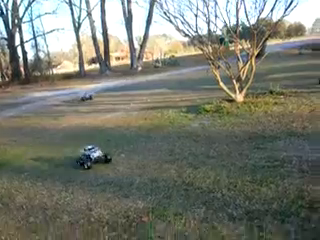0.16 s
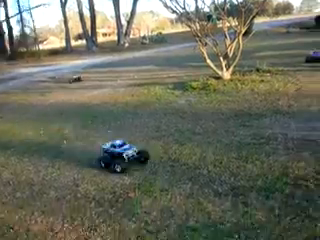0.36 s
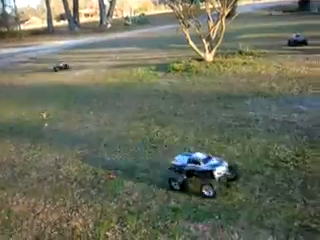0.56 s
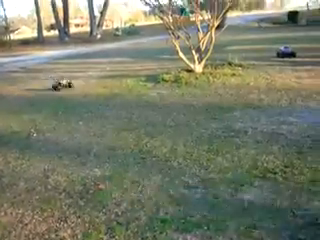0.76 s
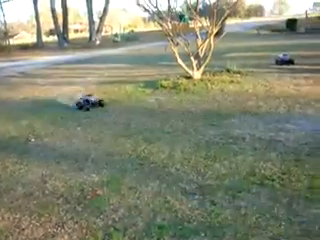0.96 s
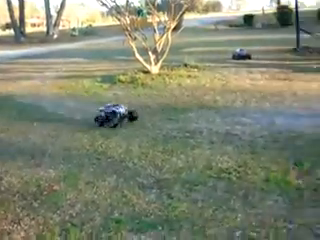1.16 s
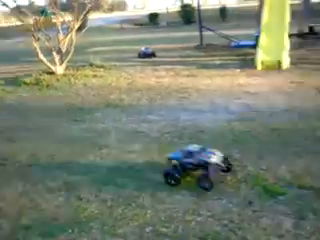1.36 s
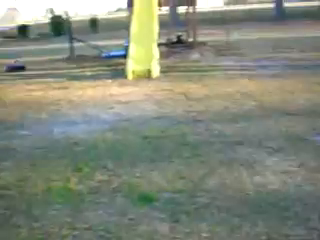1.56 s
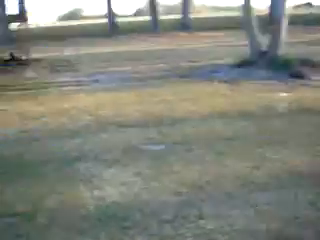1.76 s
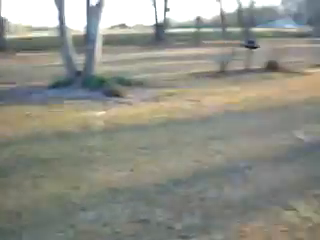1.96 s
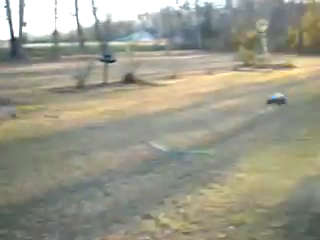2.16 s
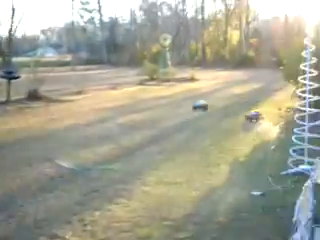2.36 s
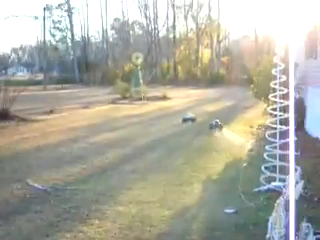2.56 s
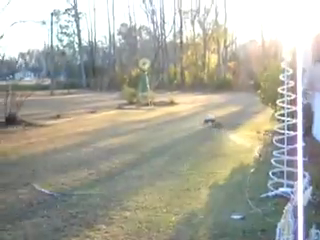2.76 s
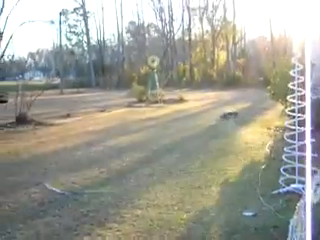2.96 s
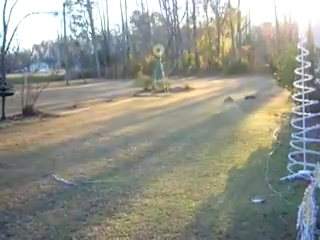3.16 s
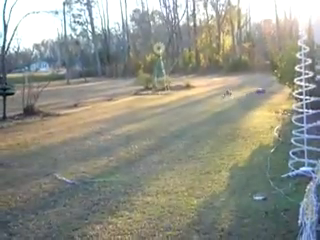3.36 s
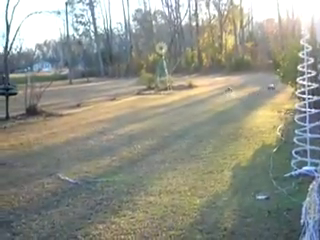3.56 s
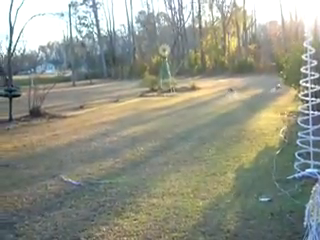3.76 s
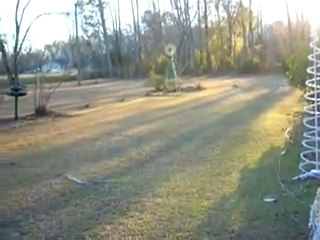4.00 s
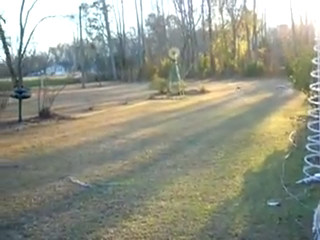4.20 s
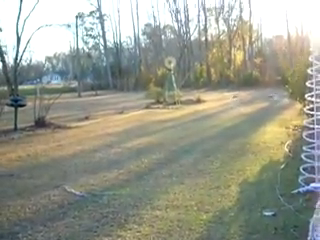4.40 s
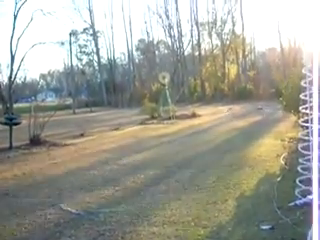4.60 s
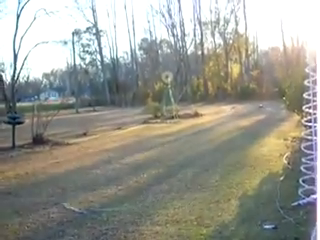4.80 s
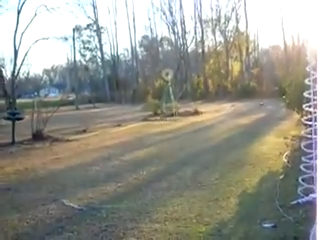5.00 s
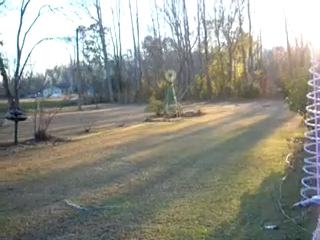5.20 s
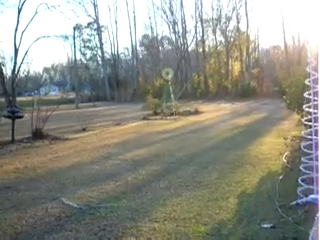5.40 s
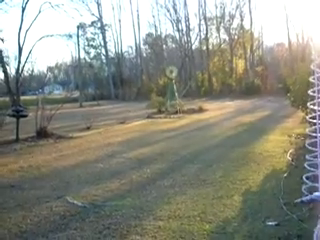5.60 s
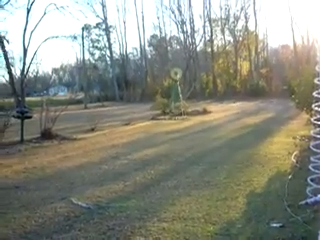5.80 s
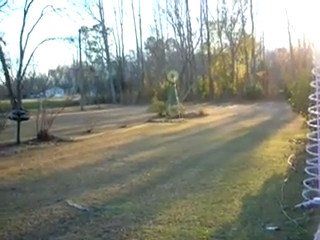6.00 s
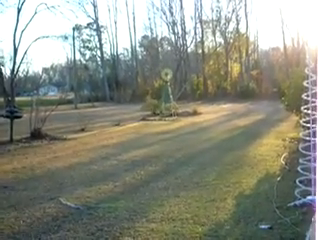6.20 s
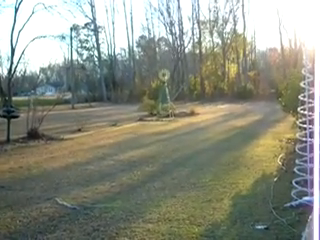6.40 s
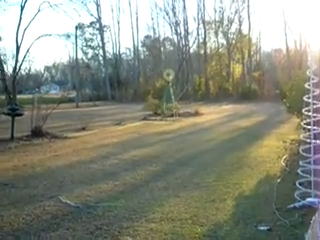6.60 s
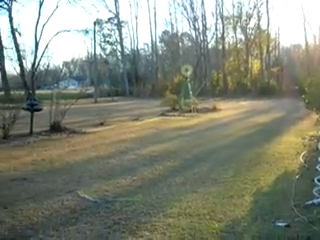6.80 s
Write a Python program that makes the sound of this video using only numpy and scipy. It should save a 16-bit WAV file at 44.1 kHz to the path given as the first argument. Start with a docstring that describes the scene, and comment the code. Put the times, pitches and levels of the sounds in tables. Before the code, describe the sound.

Two radio-controlled trucks race by a low-quality handheld microphone. Early rattling and sharp clacks lead into a loud, fluttering gear whine, then a rough chasing whine with jumpy revs. Tyres rumble and thump over bumpy grass. After about two seconds the noise shrinks with distance, returning in thin short whines and small ticks, until mostly airy background and a weak wavering buzz remain.

```python
"""Two electric radio-controlled trucks race over a lawn, pass close by and run off to the far end of the yard.
Gear whines are blurred sine lines whose pitch swings as wheels bite or the throttle revs; worn teeth add a comb.
Shaped noise makes gear rasp, chassis rattle, tyres and ground drumming; decaying bursts make knocks and landings.
Far tones, a thud and yard air lie beneath. A pocket camera with a low sample rate mirrors the top and clips peaks."""
import sys
import numpy as np
from scipy.fft import rfft, irfft, next_fast_len
from scipy.io import wavfile
from scipy.ndimage import uniform_filter1d, map_coordinates

SR = 44100
rng = np.random.default_rng(int(sys.argv[2]) if len(sys.argv) > 2 else 0)


def materialize(psi):
    """Save the field psi as 16-bit PCM at rate SR to the path in sys.argv[1].

    A 1-D psi becomes a single channel; in a 2-D psi each row is a channel.
    """
    bounded = np.clip(np.atleast_2d(psi).T, -1, 1)
    quanta = np.round(bounded * 32767).astype(np.int16)
    wavfile.write(sys.argv[1], SR, quanta)


N = 302085

# Lead truck, one curve per throttle burst: time_s, unloaded_gear_hz, unloaded_gear_db, motor_db
LEAD_RUNS = [
    [(-.1, 1680, -45.5, -28), (.12, 1700, -45, -31), (.46, 1829, -30.5, -28.5), (.53, 1950, -21.5, -28),
     (.7, 2126, -20, -28.5), (.76, 2380, -12, -30.5), (.96, 2378, -13.5, -32.5), (1.1, 2324, -12.5, -34),
     (1.26, 2467, -12.5, -36), (1.46, 2548, -13, -42.5), (1.6, 1832, -28, -45)],
    [(2.44, 1395, -40, -48), (2.56, 1732, -33.5, -35.5), (2.67, 1927, -30.5, -34), (2.8, 1404, -40, -50.5)],
    [(3.45, 1622, -30.5, -37), (3.6, 2238, -21.5, -43), (3.74, 2190, -21, -41), (3.99, 2271, -25, -43.5),
     (4.08, 1758, -33, -46), (4.17, 1700, -44, -52.5)],
    [(4.9, 1600, -60, -50), (5.45, 1619, -64, -57.5), (5.9, 1816, -60, -54), (6.5, 1900, -60, -59)],
]
# Wheels bite the turf and load the lead motor: time_s, gear_sag_hz, half_length_s (before RECOVERY_RATIO)
BITES = [(0.581, 224.4, 0.026), (0.695, 301.6, 0.064), (0.842, 313.6, 0.03), (1.004, 269.9, 0.029),
         (1.169, 205, 0.027), (1.333, 236.7, 0.016), (1.402, 249.5, 0.036), (1.506, 293.5, 0.018),
         (3.56, 215.9, 0.037), (3.645, 455.6, 0.027), (3.788, 205.5, 0.025), (3.912, 462.8, 0.022),
         (4.04, 197.6, 0.018)]
# Even motor lines: shaft_order, relative_db
MOTOR_ORDERS = [(2, -4.5), (4, 1.5), (6, -5)]
# Both drivetrains, near and far: time_s, rattle_relative_db, rasp_relative_db
DRIVETRAIN = [(0.0, -21, -27), (0.02, -26.5, -31), (0.46, -27, -21.5), (0.57, -24, -21.5),
              (1.1, -25.5, -24), (1.2, -30, -29), (1.6, -33, -27.5), (1.64, -33.5, -25.5),
              (1.77, -32.5, -29), (1.83, -32, -25.5), (2.35, -37.5, -28), (2.54, -36.5, -24),
              (2.88, -39, -31.5), (3.39, -39.5, -31), (3.43, -44, -23), (3.49, -37.5, -29),
              (3.99, -41.5, -31.5), (4.33, -45, -39), (4.37, -49, -34.5), (4.5, -45, -36.5),
              (5.67, -51, -46), (5.74, -46, -44), (6.18, -47.5, -46.5), (6.85, -46, -39)]
# Both trucks' wheels on the lawn: time_s, ground_db, tyre_db
WHEELS = [(0.0, -38, -32.5), (0.11, -42.5, -30), (0.62, -40, -29.5), (0.7, -38.5, -24), (1.1, -39.5, -24),
          (1.13, -31.5, -28.5), (1.19, -41.5, -30), (1.44, -43, -34.5), (1.53, -41, -27), (1.57, -51, -34),
          (1.7, -31.5, -25), (2.1, -42, -31.5), (2.14, -39, -26.5), (2.42, -49.5, -39), (2.63, -41.5, -34),
          (2.78, -51, -36.5), (2.84, -50, -40), (3.31, -48.5, -43), (3.6, -43.5, -36), (3.98, -46, -43),
          (4.13, -49.5, -44.5), (4.24, -41, -43), (5.32, -52, -47.5), (6.8, -52.5, -46)]
# Noise colours of tyres, ground, chassis rattle, gear rasp and yard air: frequency_hz, relative_db
TYRE_COLOUR = [(120, -40.5), (230, -18.5), (340, -0.5), (470, -3), (570, -6), (700, -13), (950, -12.5),
               (1400, -35.5), (3000, -86.5)]
GROUND_COLOUR = [(30, -32.5), (80, -22.5), (130, -10.5), (200, -1), (250, 2.5), (320, -2.5), (600, -44),
                 (2000, -95)]
RATTLE_COLOUR = [(400, -36.5), (720, -23), (880, -3.5), (1020, -0.5), (1140, 2), (1300, -1), (1600, -1),
                 (1900, -2.5), (2400, 2), (3200, -16.5), (4500, -61)]
RASP_COLOUR = [(1200, -30.5), (1800, -12), (2250, -13.5), (2650, 1), (3000, -0.5), (3400, -3.5),
               (3900, -10), (4400, -32), (4900, -57)]
YARD_COLOUR = [(20, 7.5), (30, 8), (45, 0), (100, -4), (300, -0.5), (500, -5.5), (800, 2.5), (1100, -5.5),
               (1600, -13.5), (2900, -3), (3900, -9), (5000, -58)]
# Hard plastic knocks: start_s, relative_peak_db, ring_hz
KNOCKS = [(0.081, -8, 2910), (0.309, -5, 2890), (1.764, -27, 1014), (1.795, -13.5, 3300),
          (1.946, -10, 3340), (2.245, -10.5, 2570), (2.741, -13, 3250), (2.961, -15.5, 2740),
          (3.362, -13.5, 2905), (3.529, -20, 1976), (4.275, -17, 2900), (4.479, -23, 1160),
          (4.538, -25, 3120), (4.593, -18, 3220)]
# Chasing truck revs and eases off: time_s, gear_change_hz, half_length_s, gain_db
REVS = [(1.271, 170, .22, 7.5), (1.671, 170, .1, -1.5), (1.831, 330, .04, 0), (1.944, 300, .04, 1),
        (2.279, -60, .07, 5.5), (2.54, 330, .075, 5.5), (2.724, 270, .05, -11), (3.31, 150, .035, 3),
        (3.482, 379.5, .05, 0.5), (3.746, 40, .17, -3), (4.099, 129.5, .12, -1), (4.42, 260, .13, 3.5),
        (4.919, -140, .07, 2), (5.25, 180, .25, -6), (6.001, -110, .4, -6), (6.626, 390, .1, 6),
        (6.801, 149, .06, 1)]
# Chasing truck's gearbox response to its gear tone: frequency_hz, gain_db
GEARBOX = [(1280, -13), (1350, -7.5), (1420, -8.5), (1530, -19), (1680, -11.5), (1900, 2)]
# Landings on the turf: start_s, relative_peak_db
LANDINGS = [(1.475, -15), (1.517, -15.5), (1.606, -14), (1.671, -16.5), (2.124, -14), (3.602, -18.5),
            (5.854, -19)]
# Hollow body shell resonance: centre_hz, width_hz, relative_db
SHELL = [(348, 110, 0)]
# Dull thud as the camera swings round: time_s, level_db
THUDS = [(2.195, -36.5)]
# Brief faint far-off tones: time_s, pitch_hz, peak_db
TOOTS = [(4.99, 984, -35), (5.095, 992, -37.5)]
# Camera response ahead of its sampler: frequency_hz, gain_db
INTAKE = [(3900, -0.5), (4300, -2.5), (4800, -11.5), (5400, -56)]
# Camera response after its sampler: frequency_hz, gain_db
MIRROR = [(3900, 1), (4300, -9.5), (4700, -24.5), (5000, -41.5), (5300, -62), (7000, -76.5)]

RECOVERY_RATIO = 1.3  # spin-up time over slow-down time
BITE_LOSS_DB_PER_KHZ = 7.5  # a loaded motor whines less
TEETH_RATIO = 12  # gear tone over the rate at which worn teeth come round
CRUISE_HZ, CRUISE_DB = 1350, -4  # chaser's gear tone between revs; level against the rasp curve
CHASER_IN_S = 1.1  # comes within earshot
CAMERA_RATE_HZ, TOP_HZ = 7875, 15850  # sampling rate; final cutoff


def amp(db):
    """Decibels to gain."""
    return 10 ** (np.asarray(db) / 20)


def unit(x):
    """Scale to rms 1."""
    return x / np.sqrt(np.mean(x ** 2) + 1e-20)


def along(points, hz):
    """Read (frequency, value) points on a log axis."""
    point_hz, value = np.transpose(points)
    return np.interp(np.log(hz + 1), np.log(point_hz + 1), value)


def curves(rows):
    """One value per sample for each column after the time."""
    time_s, *columns = np.transpose(rows)
    return [np.interp(np.arange(N) / SR, time_s, column) for column in columns]


def during(rows):
    """Soft-edged gate over the time a table spans."""
    t = np.arange(N) / SR
    inside = (t >= rows[0][0]) & (t <= rows[-1][0])
    return uniform_filter1d(1.0 * inside, SR // 40)


def wobble(rate_hz):
    """Smooth random curve with rate_hz knots a second."""
    knots = rng.standard_normal(int(N * rate_hz / SR) + 4)
    return map_coordinates(knots, [np.arange(N) * rate_hz / SR])


def swell(peak_s, width_s, tail=1):
    """Bell of height 1 about a moment; tail stretches its second half."""
    dt = np.arange(N) / SR - peak_s
    return np.exp(-(np.where(dt < 0, dt, dt / tail) / width_s) ** 2)


def filtered(x, response):
    """Multiply the spectrum of x by a response of frequency."""
    size = next_fast_len(N + SR // 2)
    spectrum = rfft(x, size) * response(np.fft.rfftfreq(size, 1 / SR))
    return irfft(spectrum, size)[:N]


def noise(colour):
    """Coloured noise of rms 1."""
    return unit(filtered(rng.standard_normal(N), lambda hz: amp(along(colour, hz))))


def tone(hz, blur_hz, flutter_db, flutter_rate_hz):
    """Gear line of rms 1: backlash blurs its pitch, the jolting chassis shakes its level."""
    phase = 2 * np.pi * np.cumsum(hz + blur_hz * wobble(400)) / SR
    depth = amp(flutter_db) - 1
    return unit(np.sin(phase) * (1 + depth * np.tanh(wobble(flutter_rate_hz))))


def lead_truck(mesh_db=0.0, octave_db=-18.0, teeth_db=-5):
    """Clear gear tone on the third shaft order, over rougher motor orders; it sags whenever the wheels bite."""
    free_hz, gear_db, motor_db = curves([row for run in LEAD_RUNS for row in run])
    throttle = sum(during(run) for run in LEAD_RUNS)
    sag_hz = sum(hz * swell(s, width_s, RECOVERY_RATIO) for s, hz, width_s in BITES)
    pitch_hz = (free_hz - sag_hz) * (1 + .006 * wobble(55))

    mesh = tone(pitch_hz, blur_hz=25, flutter_db=4.3, flutter_rate_hz=110)
    # an off-centre spur gear adds side lines; uneven teeth add a hoarse skirt
    spur = np.sin(2 * np.pi * np.cumsum(pitch_hz / 21) / SR)
    roughness = 1 + .2 * spur + .2 * wobble(1100)
    mesh = unit(mesh * roughness * amp(2 * np.tanh(wobble(38))))
    octave = tone(2 * pitch_hz, blur_hz=50, flutter_db=5.5, flutter_rate_hz=130)

    loss_db = BITE_LOSS_DB_PER_KHZ * sag_hz / 1000
    gears = amp(gear_db - loss_db) * (amp(mesh_db) * mesh + amp(octave_db) * octave)
    rasp_db = curves(DRIVETRAIN)[1]
    teeth = amp(rasp_db + teeth_db) * worn_teeth(pitch_hz)
    return throttle * (gears + amp(motor_db) * motor(pitch_hz) + teeth)


def motor(pitch_hz, blur_ratio=.011):
    """Even orders of a shaft turning at a third of the gear tone; higher orders blur more."""
    lines = np.zeros(N)
    for order, db in MOTOR_ORDERS:
        hz = order * pitch_hz / 3
        lines += amp(db) * tone(hz, blur_hz=blur_ratio * hz, flutter_db=6.0, flutter_rate_hz=80)
    return lines


def worn_teeth(pitch_hz, count=26):
    """Tooth errors repeat every turn: a comb of lines gliding with speed, coloured by the gearbox."""
    turn = 2 * np.pi * np.cumsum(pitch_hz / TEETH_RATIO) / SR
    phases = rng.uniform(0, 2 * np.pi, count)
    orders = range(count // 3, count)
    comb = sum(amp(4 * wobble(9)) * np.sin(k * turn + phases[k]) for k in orders)
    return unit(filtered(comb, lambda hz: amp(along(RASP_COLOUR, hz))))


def running_noise(tyre_db=0, ground_db=0, rattle_db=4.0, rasp_db=-2.5):
    """Bumpy turf jolts tyres, ground, chassis and gears together; each also chatters at its own speed."""
    rattle_curve_db, rasp_curve_db = curves(DRIVETRAIN)
    ground_curve_db, tyre_curve_db = curves(WHEELS)
    jolt = wobble(32)
    tyres = unit(noise(TYRE_COLOUR) * amp(1.5 * jolt + 2.0 * wobble(90)))
    ground = unit(noise(GROUND_COLOUR) * amp(1 * jolt + 1.2 * wobble(50)))
    rattle = unit(noise(RATTLE_COLOUR) * amp(1.4 * jolt + 1.7 * wobble(250)))
    rasp = unit(noise(RASP_COLOUR) * amp(1.8 * jolt + 2.3 * wobble(300)))
    wheels = amp(tyre_curve_db + tyre_db) * tyres + amp(ground_curve_db + ground_db) * ground
    return wheels + amp(rattle_curve_db + rattle_db) * rattle + amp(rasp_curve_db + rasp_db) * rasp


def yard_air(level_db=-45.5):
    """Steady coloured noise for the still air of the yard."""
    return amp(level_db) * noise(YARD_COLOUR)


def knocks(t60_s=0.062, crack_t60_s=0.024, ring_db=-7, crack_db=-14):
    """Suspension parts hit their stops: a noise crack and a short plastic ring."""
    ring, crack = np.zeros(N), np.zeros(N)
    age_s = np.arange(SR // 8) / SR
    for start_s, db, hz in KNOCKS:
        start = round(start_s * SR)
        span = slice(start, start + len(age_s))
        ring[span] += amp(db - 60 * age_s / t60_s) * np.sin(2 * np.pi * hz * age_s)
        crack[span] += amp(db - 60 * age_s / crack_t60_s)
    # frequency_hz, relative_db
    crack_noise = noise([(150, -16.0), (500, -11.0), (3000, 9.0), (4000, -2), (5000, -62.5)])
    return amp(ring_db) * ring + amp(crack_db) * crack * crack_noise


def chasing_truck(breakup_db=3, octave_db=-1.5):
    """Hoarse whine with a strong octave; revs bend pitch and level, bumps make it waver and break up."""
    revs = [(swell(s, width_s), hz, db) for s, hz, width_s, db in REVS]
    rev_hz = sum(hz * rev for rev, hz, db in revs)
    rev_db = sum(db * rev for rev, hz, db in revs)
    pitch_hz = (CRUISE_HZ + rev_hz) * (1 + .011 * wobble(26))
    rasp_db = curves(DRIVETRAIN)[1]
    level_db = rasp_db + CRUISE_DB + rev_db + breakup_db * np.tanh(wobble(28))

    # gearbox resonance near 1420 Hz draws the lower line towards it
    pull = .7 * np.exp(-((pitch_hz - 1420) / 130) ** 2)
    drawn_hz = pitch_hz + (1420 - pitch_hz) * pull
    low = tone(drawn_hz, blur_hz=28, flutter_db=4.5, flutter_rate_hz=50)
    high = tone(2 * pitch_hz, blur_hz=48, flutter_db=5, flutter_rate_hz=55)
    chatter = 1 + .22 * wobble(700)
    heard = during([(CHASER_IN_S,), (N / SR,)])
    lines = amp(along(GEARBOX, pitch_hz)) * low + amp(octave_db) * high
    return heard * amp(level_db) * chatter * lines


def landings(t60_s=.09, level_db=-12):
    """Each landing is a decaying noise burst through the hollow shell's resonance."""
    t = np.arange(N) / SR
    blows = sum(amp(db - 60 * np.abs(t - s) / t60_s) * (t >= s) for s, db in LANDINGS)

    def shell(hz):
        """Band-pass resonance of the shell."""
        return sum(amp(db) * 1j * hz * width / (centre ** 2 - hz ** 2 + 1j * hz * width)
                   for centre, width, db in SHELL)

    return amp(level_db) * blows * unit(filtered(rng.standard_normal(N), shell))


def thuds(width_s=0.009):
    """Low noise push under a bell envelope, with no ring."""
    t = np.arange(N) / SR
    push = sum(amp(db) * np.exp(-((t - s) / width_s) ** 2 / 2) for s, db in THUDS)
    # frequency_hz, relative_db
    return push * noise([(30, -13.0), (70, -7), (130, 6), (400, -27), (1500, -77)])


def toots(width_s=0.0074):
    """Short soft sine tones from far off, under bell envelopes."""
    t = np.arange(N) / SR
    return sum(amp(db) * np.exp(-((t - s) / width_s) ** 2 / 2) * np.sin(2 * np.pi * hz * t)
               for s, hz, db in TOOTS)


def scene():
    """The trucks over the still air of the yard."""
    trucks = lead_truck() + running_noise() + knocks() + chasing_truck() + landings()
    return (trucks + yard_air() + thuds() + toots())[None]


def record(dry, overload=0.735, top=0.72, hiss_db=-91, offset=-0.053):
    """Input saturates, coarse sampling mirrors sound about half its rate, and the off-centre output clips."""
    pressed = dry[0] / (1 + np.abs(dry[0] / overload) ** 6) ** (1 / 6)
    band = filtered(pressed, lambda hz: amp(along(INTAKE, hz)))
    # the carrier adds the first images either side of the sampling rate
    sampled = band * (1 + 2 * np.cos(2 * np.pi * CAMERA_RATE_HZ * np.arange(N) / SR))
    sound = filtered(sampled, lambda hz: amp(along(MIRROR, hz)))
    clipped = np.clip(sound + offset, -top, top)
    hiss = amp(hiss_db) * noise([(5000, -9.5), (15000, -15.5)])
    return filtered(clipped + hiss, lambda hz: hz < TOP_HZ)[None]


dry = scene()
out = record(dry)
materialize(out)
```